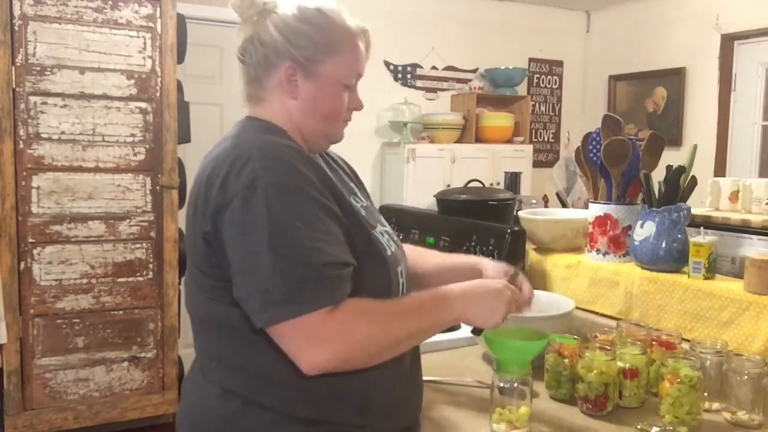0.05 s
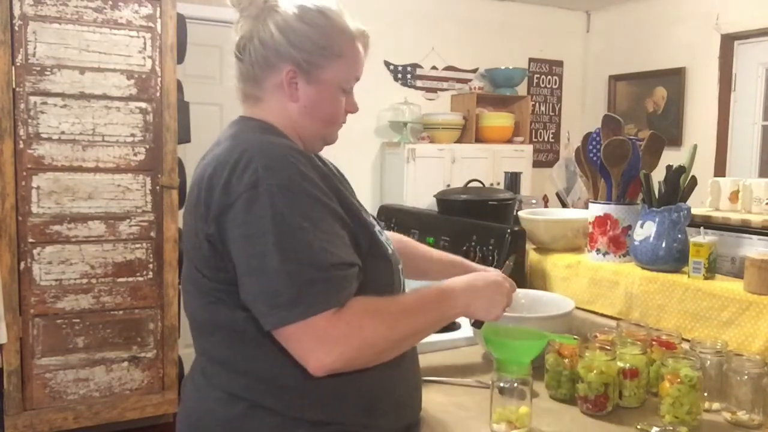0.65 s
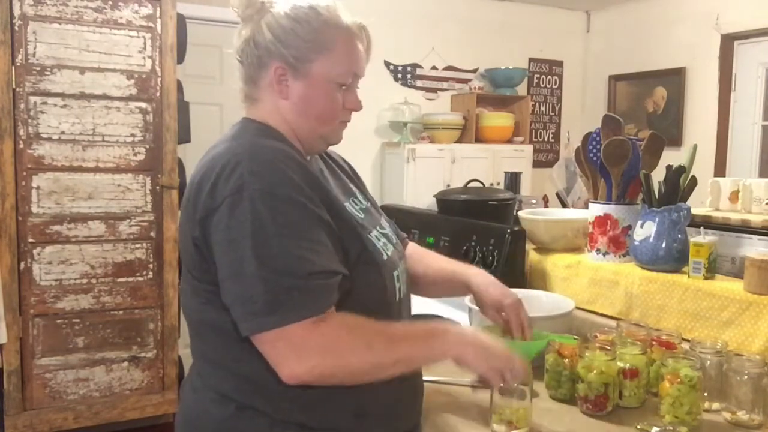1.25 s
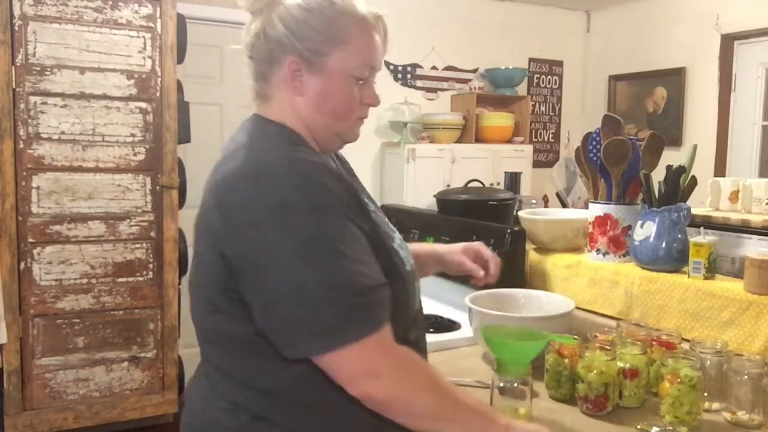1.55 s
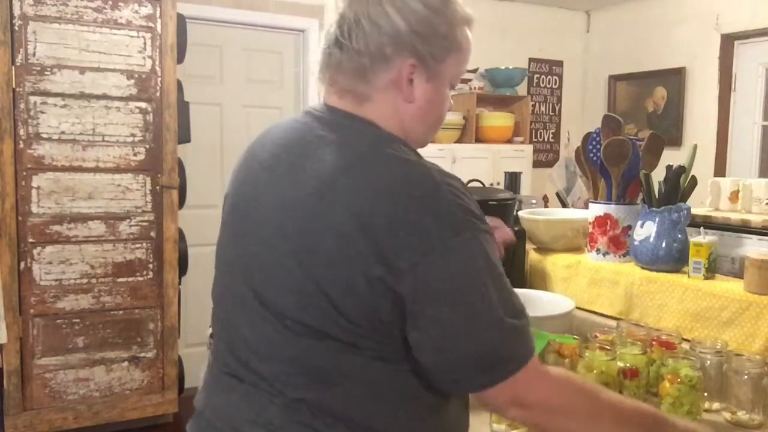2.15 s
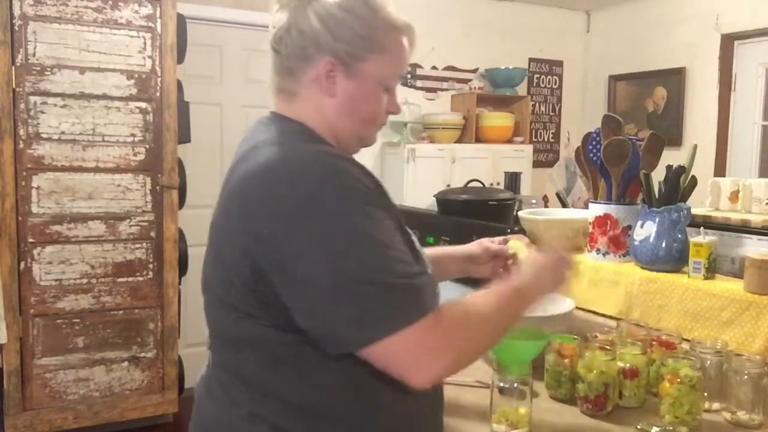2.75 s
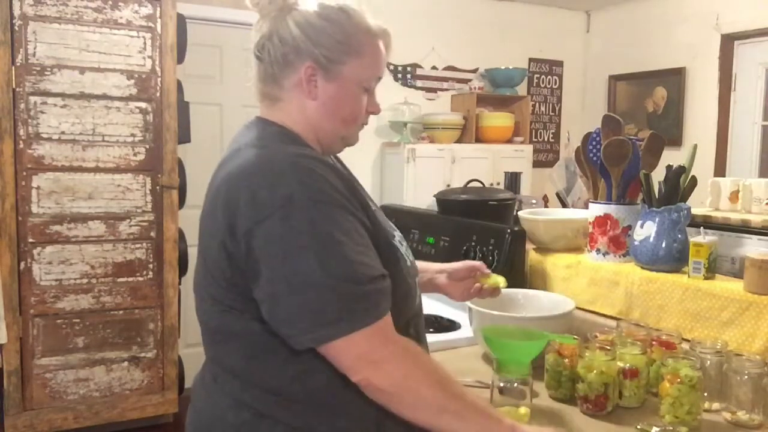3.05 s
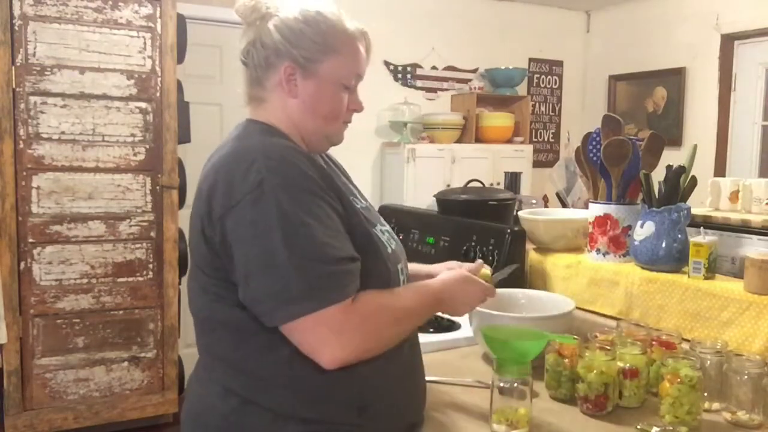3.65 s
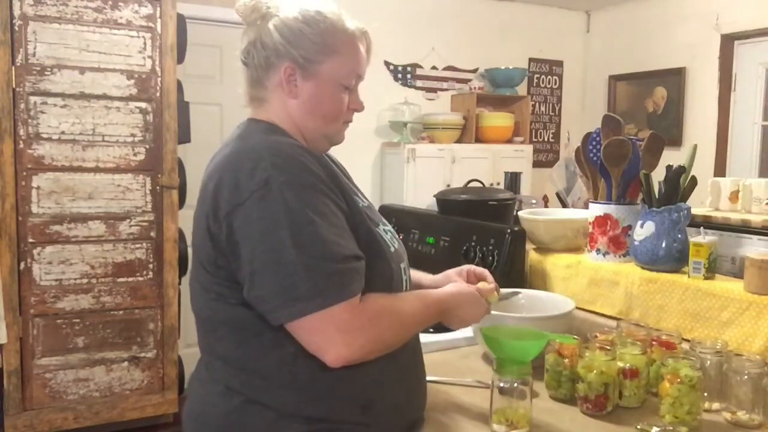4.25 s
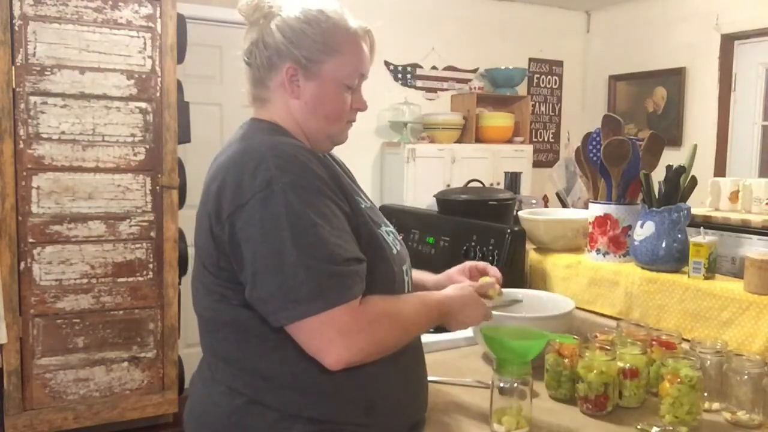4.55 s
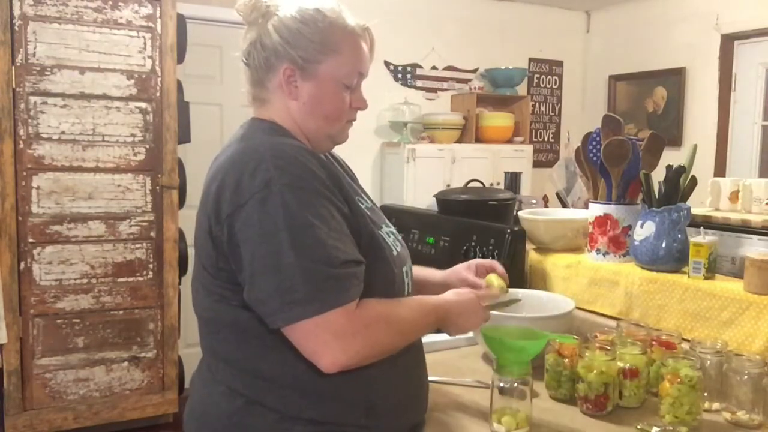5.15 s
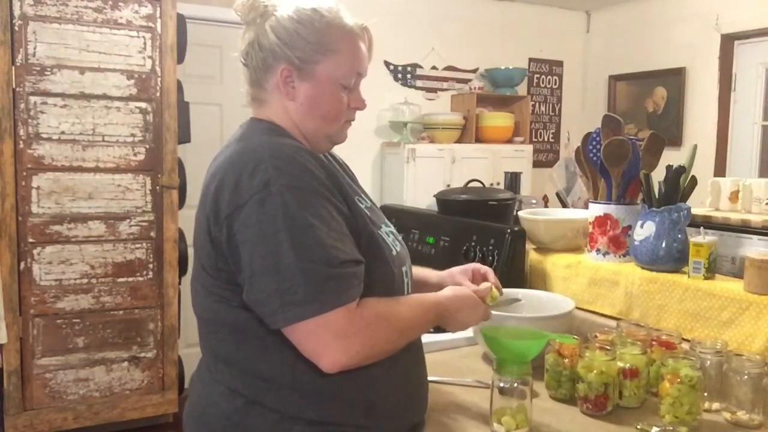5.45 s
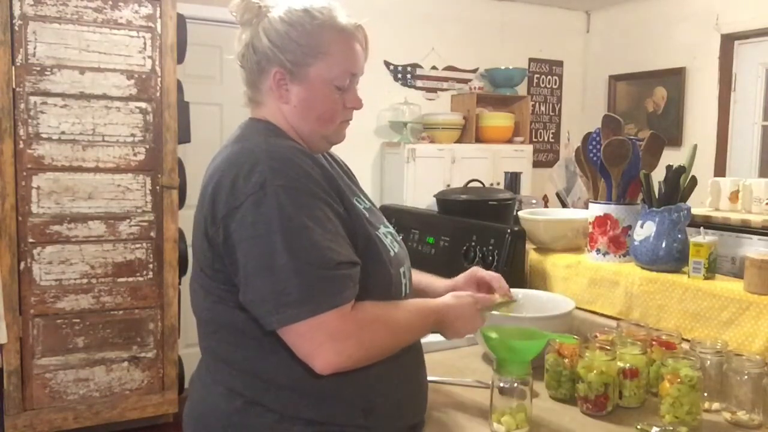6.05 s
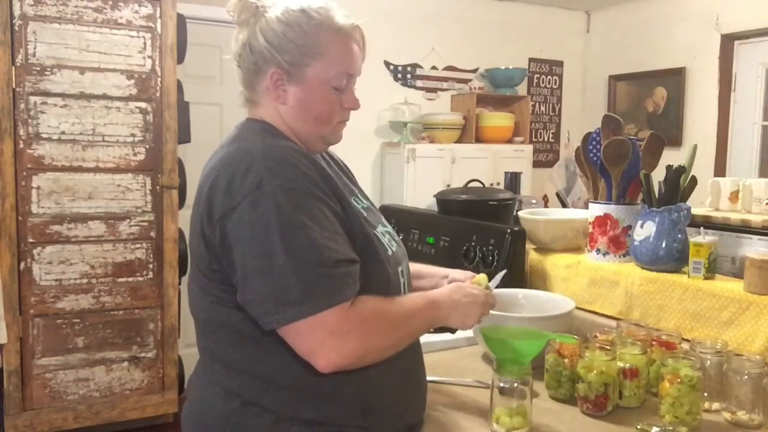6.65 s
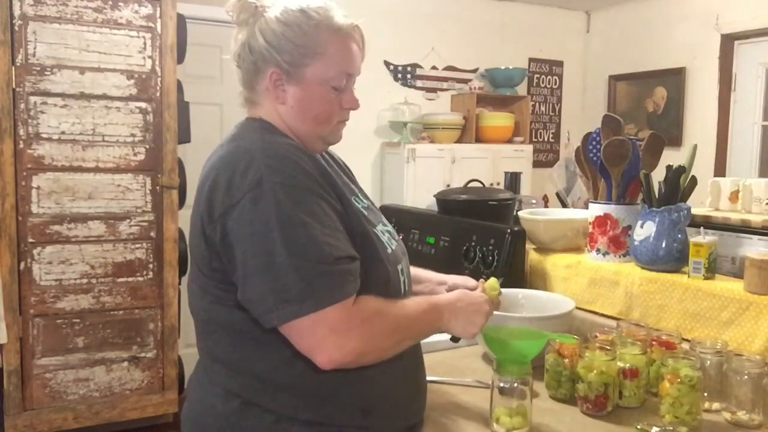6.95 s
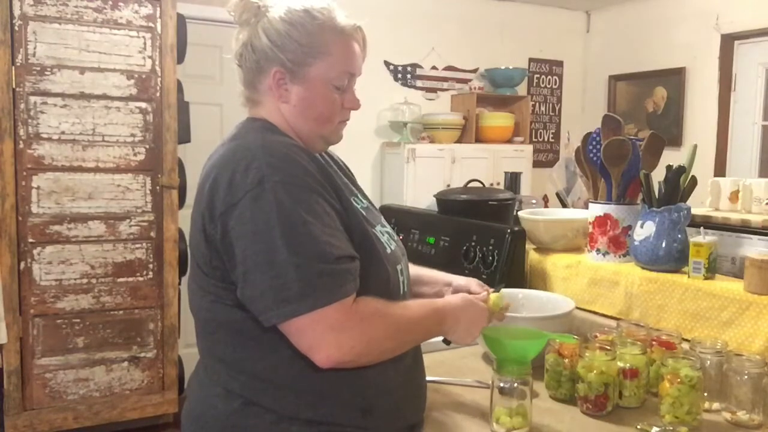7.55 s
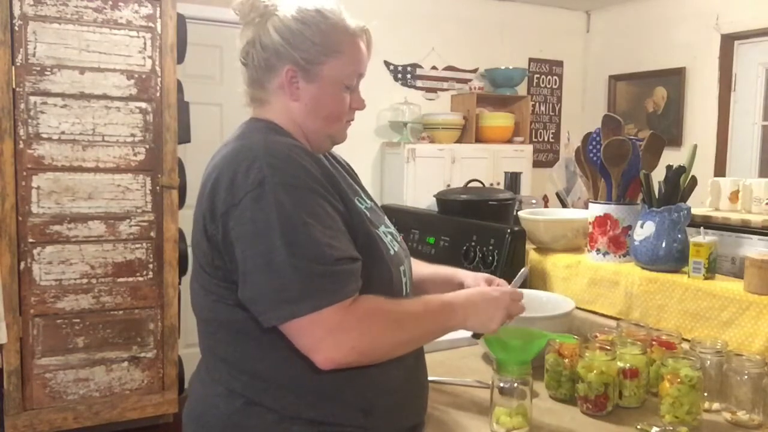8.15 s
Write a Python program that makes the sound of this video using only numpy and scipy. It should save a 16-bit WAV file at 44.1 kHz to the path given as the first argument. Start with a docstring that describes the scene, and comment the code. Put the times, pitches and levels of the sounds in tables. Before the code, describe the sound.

Heard from a little way off in an echoing kitchen, a knife hits the counter with a loud knock and a short bouncing rattle. Thin metallic ticks and soft table bumps follow. A piece of pepper clacks off a plastic funnel, and a run of small, crisp cuts continues to the end, with a few soft thuds of falling pieces. A low appliance hum lies under everything.

```python
"""Peppers are cut by hand over a funnel in a small, echoing kitchen where an appliance hums throughout.
After a little rubbing and one faint cut, the knife drops on the counter and rattles (1.5 s). Its blade
rings as it is picked up, a hand bumps the table and hollow peppers knock together. From 3.8 s, stroke
after stroke snaps the skin, rings the air inside and tears the crunchy flesh, while pieces bounce off
the plastic funnel or land with soft thuds."""
import sys
import numpy as np
from scipy import signal
from scipy.fft import rfft, irfft
from scipy.io import wavfile

SR = 44100
rng = np.random.default_rng(int(sys.argv[2]) if len(sys.argv) > 2 else 0)


def persist_wave(psi):
    """Save psi, clipped to +-1, as 16-bit WAV."""
    counts = np.round(np.clip(psi, -1, 1) * 32767).astype(np.int16)
    wavfile.write(sys.argv[1], SR, np.atleast_2d(counts).T)


N = 370881
CREAK_S = .02  # how long the skin creaks before it splits


def amp(db):
    """Turn decibels into a gain."""
    return 10 ** (np.asarray(db) / 20)


def seconds(length):
    """The time of each sample in a sound of this length."""
    return np.arange(int(length * SR)) / SR


def lookup(points, hz):
    """Read between (f/Hz, value) points, with octaves evenly spaced."""
    f, value = np.transpose(points)
    return np.interp(np.log(np.maximum(hz, 1)), np.log(f), value)


def colour(x, points):
    """Shape the tone of a sound with an (f/Hz, level/dB) curve."""
    size = 4096
    gains = amp(lookup(points, np.fft.rfftfreq(size, 1 / SR)))
    cepstrum = irfft(np.log(gains))
    cepstrum[1:size // 2] *= 2  # fold it so the filter never rings ahead of the sound
    cepstrum[size // 2 + 1:] = 0
    response = irfft(np.exp(rfft(cepstrum)))
    return signal.fftconvolve(x, response)[:len(x)]


def resonate(x, hz, q):
    """Let a sound ring at one pitch; a higher q rings longer."""
    return signal.lfilter(*signal.iirpeak(hz, max(q, hz / (.4 * SR)), fs=SR), x)


def level(x, db, count=None):
    """Scale a sound so its first count samples have this average (rms) level."""
    return x * amp(db) / np.sqrt(np.mean(x[:count] ** 2))


def burst(t60):
    """Noise that dies away; t60 is always the seconds taken to fade by 60 dB."""
    t = seconds(1)
    return rng.standard_normal(len(t)) * amp(-60 * t / t60)


def ring(modes):
    """The tones (modes) of a struck object, each fading at its own rate."""
    t = seconds(1)
    return sum(amp(db - 60 * t / t60) * np.sin(2 * np.pi * (hz * t + rng.random()))
               for hz, db, t60 in modes)


def walk(rate):
    """A random drift that takes a new direction rate times a second."""
    knots = rng.standard_normal(1024)
    return np.interp(np.arange(N) / SR * rate, np.arange(len(knots)), knots)


def add(out, s, x):
    """Mix a sound in, starting at s seconds."""
    start = int(s * SR)
    out[start:start + len(x)] += x[:N - start]


def appliance(wander=.24):
    """An appliance hums, its motor beating against the mains tone, and its fan moves the air."""
    # tones of the mains and the motor: f/Hz, relative level/dB, unsteadiness/dB
    hum_tones = [(120, -65.5, .8), (134.7, -67.5, 3), (240.5, -79, 2), (269.8, -75, 2.5), (335, -78.5, 2),
                 (404, -77.5, 2), (69, -84, 4)]
    # tone curves of the rushing air and the low rumble: f/Hz, level/dB
    air_curve = [(200, -31.5), (450, 0), (750, 0.5), (1100, 0), (1950, -1.5), (3000, -9), (4100, -12),
                 (5000, -18), (6400, -17.5), (8000, -22.5), (10400, -28), (11500, -25), (16000, -34.5)]
    rumble_curve = [(20, -36), (36, -22), (55, -4.5), (72, -1.5), (90, -6.5), (128, 3.5), (165, 2.5),
                    (205, -6), (275, 5), (360, -1.5), (425, 2), (480, -13.5), (600, -24), (2000, -70.5)]
    t = np.arange(N) / SR
    hum = 0
    for hz, db, unsteady_db in hum_tones:
        phase = 2 * np.pi * (hz * t + rng.random()) + wander * unsteady_db * walk(24)
        hum = hum + np.sqrt(2) * amp(db + unsteady_db * walk(4.6)) * np.sin(phase)
    air = level(colour(rng.standard_normal(N), air_curve), -65.5)
    rumble = level(colour(rng.standard_normal(N), rumble_curve), -68) * amp(2 * walk(7))
    return amp(-1.44) * hum + air + rumble


def kitchen(x, echo_s, echo_db, early_db, tail_db):
    """The room adds one echo from a near surface, early ones from the cupboards and a fading tail."""
    # how long the room rings: f/Hz, t60/s
    fade_times = [(125, 1), (500, 0.49), (1500, 0.46), (3000, 0.4), (6000, .43), (12000, 0.28)]
    # tone curve of what the walls throw back: f/Hz, level/dB
    wall_curve = [(60, -5), (200, -4), (380, -2), (600, -1), (1000, -5), (3000, -2), (6000, -1),
                  (10000, -1.5), (16000, -5.5)]
    t = seconds(1)
    hz = np.fft.rfftfreq(len(t), 1 / SR)
    noise = rfft(rng.standard_normal(len(t)))
    tail = 0
    for centre in 2. ** np.arange(5, 15):
        octave = np.clip(1 - abs(np.log2(np.maximum(hz, 1) / centre)), 0, 1)
        tail = tail + irfft(noise * octave, len(t)) * amp(-60 * t / lookup(fade_times, centre))
    tail *= np.clip((t - .008) / .0073, 0, 1)  # swells in after 8 ms
    early = burst(t60=.18) * (t > .003)
    echoes = amp(tail_db) * tail / np.linalg.norm(tail) + amp(early_db) * early / np.linalg.norm(early)
    response = colour(echoes, wall_curve)
    response[0] += 1  # the direct sound
    response[int(echo_s * SR)] += amp(echo_db)
    return signal.fftconvolve(x, response)[:N]


def table_bumps(press_s=.0065):
    """A soft push from a reaching hand makes the table shudder briefly."""
    # the pushes: t/s, relative level/dB
    bumps = [(1.93, -54.5), (2.972, -46)]
    # tone curve of the table: f/Hz, level/dB
    table_curve = [(30, -15.5), (55, -2), (75, 2.5), (110, -3.5), (170, -4.5), (240, -0.5), (290, 0),
                   (350, -16), (490, -4), (700, -18.5), (1100, -8.5), (2000, -21), (6000, -42.5),
                   (16000, -60)]
    out = np.zeros(N)
    for s, db in bumps:
        push = burst(t60=.28) * (1 - np.exp(-seconds(1) / press_s))
        add(out, s, level(colour(push, table_curve), db, count=1024))
    return out


def blade(brush_s=.0063):
    """The thin steel blade gives a high ring when it is brushed."""
    # the touches: t/s, relative level/dB
    touches = [(1.807, -56.5), (1.972, -54), (1.981, -42.5), (2.019, -48), (3.535, -73)]
    # tones of the steel: f/Hz, level/dB, t60/s
    steel_modes = [(7970, 5, 0.062), (8270, 0.5, 0.042), (9170, -10.5, 0.17)]
    swell = np.minimum(seconds(1) / brush_s, 1)
    out = np.zeros(N)
    for s, db in touches:
        add(out, s - brush_s, level(ring(steel_modes), db, count=256) * swell)
    return out


def handling():
    """Peppers are rubbed and knock together as they are picked up and turned."""
    # blade or fingers rub the skin: t/s, length/s, relative level/dB, centre f/Hz
    rubs = [(0.408, 0.073, -55, 5100), (0.554, 0.054, -66.5, 4060), (1.935, 0.051, -61.5, 6340),
            (2.109, 0.14, -58, 1870), (5.263, 0.042, -57.5, 3270), (5.861, 0.072, -61, 3320),
            (6.195, 0.052, -68.5, 4130), (7.199, 0.085, -55, 3050), (7.631, .05, -58.5, 3220),
            (8.102, 0.044, -61, 3240)]
    # hollow peppers knock together: t/s, relative level/dB
    taps = [(2.1518, -40), (2.2151, -49), (2.2356, -45)]
    out = np.zeros(N)
    for s, length, db, hz in rubs:
        add(out, s, crunch(length, db, hz))
    for s, db in taps:
        add(out, s - CREAK_S, pop(cells(), hz=1070, db=db))
    return out


def thud(db, hz, cycles=5.2):
    """A soft bump dies within a few cycles, with a little rustle of skin."""
    t = seconds(1)
    envelope = amp(-60 * t * hz / cycles) * (1 - np.exp(-t * hz * 2))
    bump = np.sin(2 * np.pi * hz * t) * envelope
    rustle = resonate(resonate(burst(t60=.079), hz, q=1), hz, q=1)
    return level(bump, db, count=256) + level(rustle, db - 5, count=256)


def landings(pitch_hz=446, pitch_spread=.03, settle_s=.009):
    """A piece lands on its edge, then settles on its side with a softer, lower bump."""
    # peppers and pieces land: t/s, relative level/dB
    falls = [(1.226, -52), (4.479, -41.5), (4.5511, -43.5), (5.063, -47.5), (5.122, -48), (5.188, -52),
             (5.289, -52.5), (6.101, -55.5), (6.22, -55.5)]
    out = np.zeros(N)
    for s, db in falls:
        hz = pitch_hz * np.exp(pitch_spread * rng.standard_normal())
        add(out, s, thud(db, hz))
        add(out, s + settle_s, thud(db - 6, hz * .6))
    return out


def strike(hits, body_curve, modes, body_t60, ring_db):
    """Each blow on an object gives a short clack and ringing tones; softer contact is duller."""
    out = np.zeros(N)
    for s, db, bright_hz in hits:
        clack = level(colour(burst(body_t60), body_curve), 0, count=256)
        tones = level(ring(modes), ring_db, count=256)
        soften = signal.butter(2, bright_hz * 1.2, fs=SR)
        add(out, s, level(signal.lfilter(*soften, clack + tones), db, count=256))
    return out


def funnel():
    """A hard piece hits the plastic funnel and bounces."""
    # the hits: t/s, relative level/dB, brightness f/Hz
    hits = [(4.0092, -27, 6340), (4.0822, -31.5, 4200), (4.477, -42, 3900)]
    # tone curve of the plastic's clack: f/Hz, level/dB
    plastic_curve = [(40, -43.5), (120, -27), (260, 2), (350, -9), (450, 1), (750, -2), (1300, 0),
                     (2200, -7), (3700, -3), (4600, -12.5), (7000, -11.5), (11000, -20.5), (16000, -8)]
    # tones of the funnel: f/Hz, level/dB, t60/s
    modes = [(440, 2, 0.07), (1336, -2.5, 0.06), (2038, -7.5, 0.11), (3030, -0.5, 0.044),
             (3800, -1.5, 0.058), (5125, -17, 0.1)]
    return strike(hits, plastic_curve, modes, body_t60=.024, ring_db=-6)


def knife_drop():
    """The knife lands on the counter and bounces, making both ring."""
    # the landing and bounces: t/s, level/dB, brightness f/Hz
    blows = [(1.5385, -25.5, 3000), (1.5408, -11.5, 7700), (1.5625, -23.5, 6000), (1.568, -24, 6000),
             (1.6253, -19, 3300), (1.675, -28.5, 2760), (1.7005, -32, 2500)]
    # tone curve of the counter's clack: f/Hz, level/dB
    counter_curve = [(30, -28.5), (100, -27), (260, -13), (400, -13), (520, -3), (700, -7.5), (1100, 1.5),
                     (2300, 1.5), (3400, -3), (6000, -8), (10000, -14), (16000, -19.5)]
    # tones of knife and counter together: f/Hz, level/dB, t60/s
    modes = [(512.8, -5, 0.078), (900, -7, 0.14), (1075, 4, 0.065), (1135, -3, 0.17), (1570, 3.5, 0.021),
             (1568, -11, 0.17), (1620, -13.5, .3), (1880, -9, .06), (2080, -13, .3), (2444, -9, .25),
             (2503, -4.5, 0.19), (2880, -15, 0.55), (3220, -16, .35), (3600, -14, .2), (5400, -17, .15)]
    return strike(blows, counter_curve, modes, body_t60=.049, ring_db=-9.5)


def cells(per_s=7000, scatter_db=2.5):
    """A quarter second of tiny, uneven clicks as cells burst; the defaults are for tight skin."""
    size = SR // 4
    bursts = rng.random(size) < per_s / SR
    strength = np.minimum(rng.exponential(size=size), 3)
    sign = rng.choice([-1, 1], size)
    return bursts * sign * amp(scatter_db * strength)


def crunch(length, db, hz, fade_db=7, entry_s=.0038, release_s=.041):
    """Moist cells burst one after another; a large hollow rings lower and more clearly."""
    # tone curve of tearing flesh: f/Hz, level/dB
    flesh_curve = [(200, -38), (1000, 8.5), (3000, -0.5), (6000, 1), (9000, -3), (12000, -14.5),
                   (16000, -26)]
    t = seconds(.25)
    release = np.clip((length - t) / release_s + 1, 0, 1)
    pressure = (1 - np.exp(-t / entry_s)) * amp(-fade_db * t / length) * release
    tear = cells(per_s=800, scatter_db=3.5) * pressure
    hollow = resonate(tear, hz, q=max(5600 / hz, 1.6))
    hollow = resonate(hollow, hz, q=.7)
    moist = signal.lfilter(*signal.butter(2, 9000, fs=SR), hollow)
    fizz = colour(tear, flesh_curve)
    return level(level(moist, 0) + level(fizz, -11), db, count=int(length * SR * 2 / 3))


def rupture(t60, split_s=.002, creak_db=-25, creak_fade_s=.0078):
    """The force on the skin over time: it creaks for a moment, gives way and lets go."""
    t = seconds(.25) - CREAK_S
    after = np.maximum(t, 0)
    creak = amp(creak_db) * np.exp(-abs(t) / creak_fade_s)
    split = 1 - np.exp(-(after / split_s) ** 2)
    return creak + split * amp(-60 * after / t60)


def snap_level(x, db):
    """Set the level of the first 6 ms after the skin gives way."""
    return x * amp(db) / np.std(x[int(CREAK_S * SR):int((CREAK_S + .006) * SR)])


def pop(clicks, hz, db):
    """Clicks in the skin ring the air inside the pepper."""
    hollow = resonate(clicks * rupture(t60=.02), hz, q=6)
    return snap_level(resonate(hollow, hz, q=.78), db)


def snap(crack_db, splinter_db, pop_db, hz):
    """The skin splits in a quick run of clicks: a crack, fine splintering and a hollow pop."""
    # tone curves of the crack and the splintering: f/Hz, level/dB
    crack_curve = [(300, -17.5), (1500, 0.5), (3000, -1), (6000, -1.5), (8000, -7.5), (12000, -18),
                   (16000, -28)]
    splinter_curve = [(2000, -25), (6000, -4.5), (8500, -4), (10400, -4), (12500, -1.5), (16000, -11)]
    clicks = cells()
    tear = clicks * rupture(t60=.018)
    crack = snap_level(colour(tear, crack_curve), crack_db)
    splinter = snap_level(colour(tear, splinter_curve), splinter_db)
    return crack + splinter + pop(clicks, hz, pop_db)


def cuts(tick_gap_s=.027):
    """Each stroke snaps the skin and tears the flesh; fibres tick and ring the same hollow."""
    # knife strokes, levels relative: t/s, length/s, snap/dB, pop/dB, flesh/dB, hollow's f/Hz
    strokes = [(1.188, .015, -58, -59, -64, 1399), (3.799, 0.078, -49, -49, -61, 2620),
               (4.257, 0.14, -40, -40.5, -60, 1170), (4.734, 0.15, -41.5, -33.5, -55.5, 1036),
               (4.995, .12, -46, -39.5, -60, 1200), (5.574, 0.051, -38.5, -36.5, -49.5, 1515),
               (5.686, 0.093, -48, -49, -58, 1180), (5.921, 0.026, -45.5, -46.5, -69, 1960),
               (6.7957, 0.05, -40.5, -35.5, -52, 2200), (6.9366, 0.061, -67, -45, -54, 2010),
               (7.092, 0.065, -61, -58, -54, 2600), (7.6757, 0.061, -42.5, -31, -40.5, 2600),
               (7.789, .045, -52, -44, -54.5, 2300)]
    # tough fibres give way, levels relative: t/s, crack/dB, splintering/dB
    fibres = [(0.4085, -53, -56), (1.2006, -53.5, -70), (2.236, -52.5, -61), (3.8685, -47, -56),
              (4.303, -40, -65), (4.3824, -44.5, -48), (4.7693, -44.5, -62), (4.8386, -44.5, -49),
              (4.8779, -49, -59), (5.057, -48, -61), (5.4798, -51, -59), (5.7626, -48, -67),
              (5.8413, -51, -80), (6.9749, -45.5, -58), (7.1248, -52, -56), (7.3242, -47, -61),
              (7.381, -52.5, -65), (7.589, -54.5, -53), (7.8297, -47.5, -67)]
    snaps, tearing = np.zeros(N), np.zeros(N)
    for s, length, snap_db, pop_db, flesh_db, hz in strokes:
        add(snaps, s - CREAK_S, snap(snap_db, snap_db - 7.5, pop_db, hz))
        add(tearing, s, crunch(length, flesh_db, hz))
        for k in range(6):  # small fibres tick while the stroke lasts
            delay = (k + rng.random()) * tick_gap_s
            if delay < length:
                add(snaps, s + delay - CREAK_S, snap(-57.5, -62.5, -65, hz))
    for s, db, splinter_db in fibres:
        nearest = min(strokes, key=lambda cut: abs(cut[0] + cut[1] - s))  # the stroke ending closest
        add(snaps, s - CREAK_S, snap(db, splinter_db, db - 7.5, hz=nearest[-1]))
    return amp(-3) * snaps + tearing


def scene():
    """The dropped knife and the work of the hands, heard across the kitchen over the hum."""
    knock = knife_drop()
    hands = funnel() + cuts() + handling() + landings() + table_bumps() + blade()
    counter_sound = kitchen(knock, echo_s=.0046, echo_db=-17.5, early_db=-7.5, tail_db=-6.5)
    hand_sound = kitchen(hands, echo_s=.0043, echo_db=-9.5, early_db=-1.5, tail_db=-6.5)
    return (counter_sound + amp(-3.5) * hand_sound + appliance())[None]


def record(dry):
    """Cut away the highest treble, above 16100 Hz."""
    return signal.sosfilt(signal.ellip(10, .1, 80, 16100, fs=SR, output="sos"), dry)


dry = scene()
out = record(dry)
persist_wave(out)
```